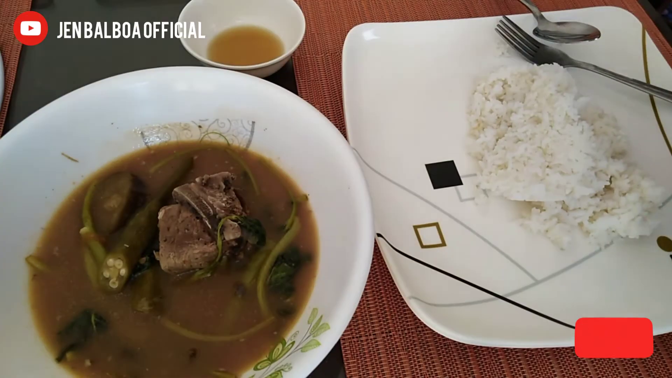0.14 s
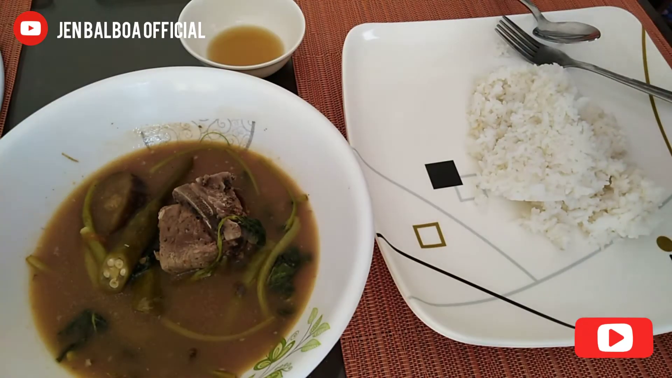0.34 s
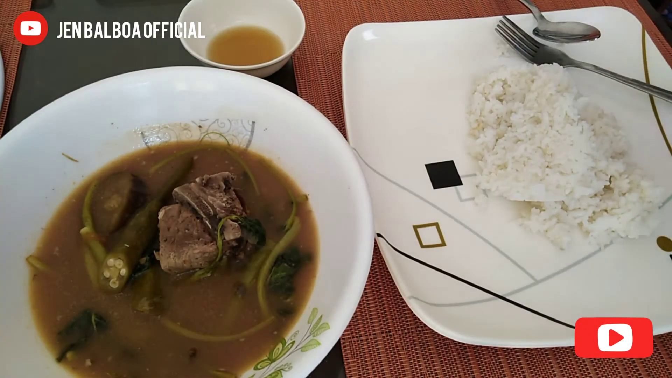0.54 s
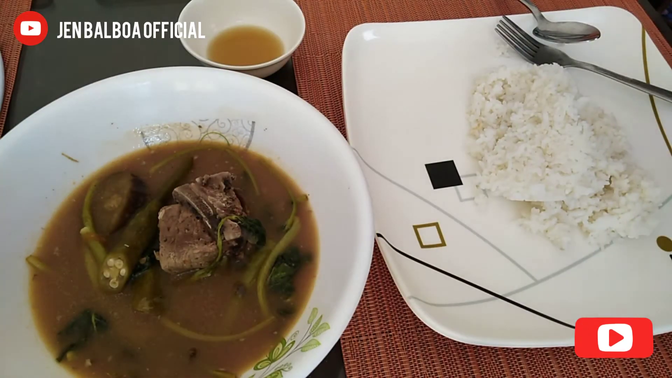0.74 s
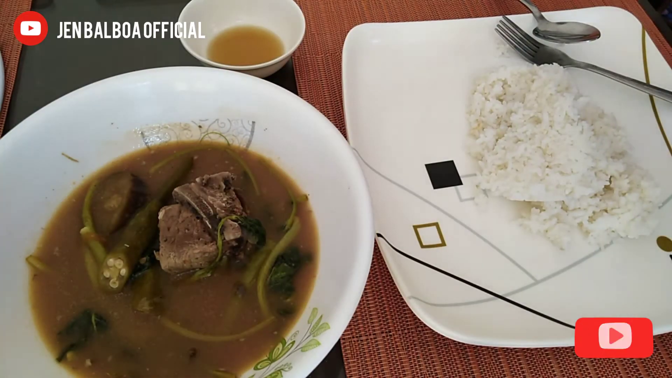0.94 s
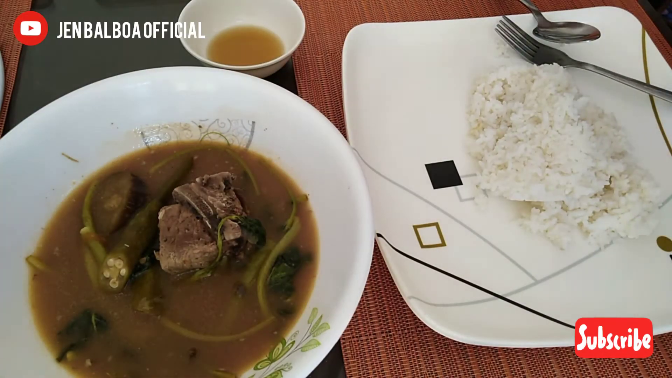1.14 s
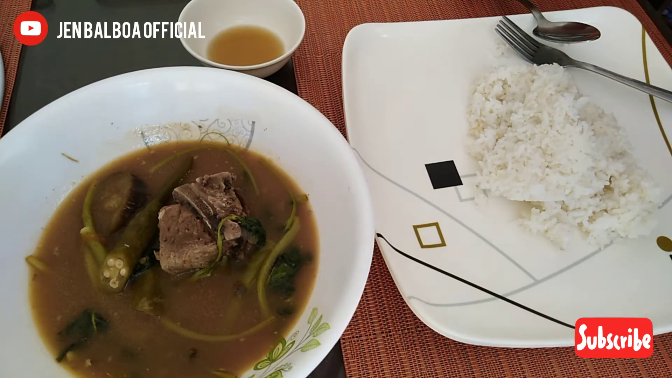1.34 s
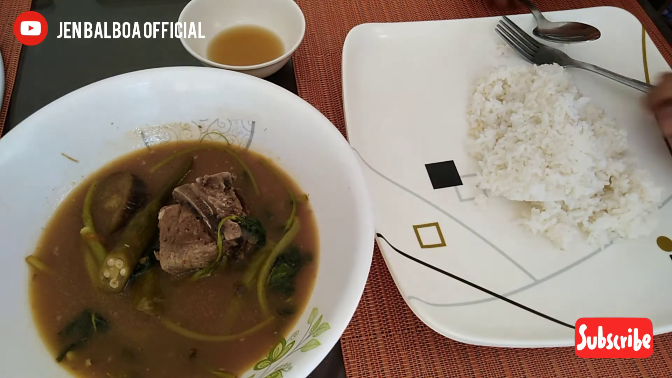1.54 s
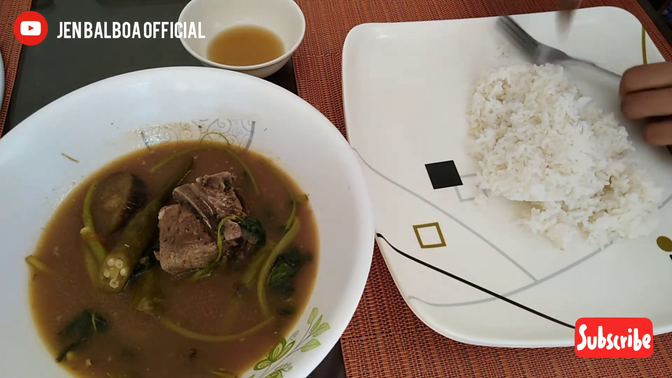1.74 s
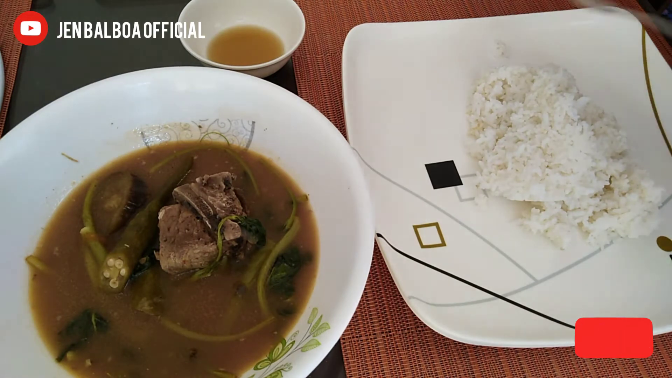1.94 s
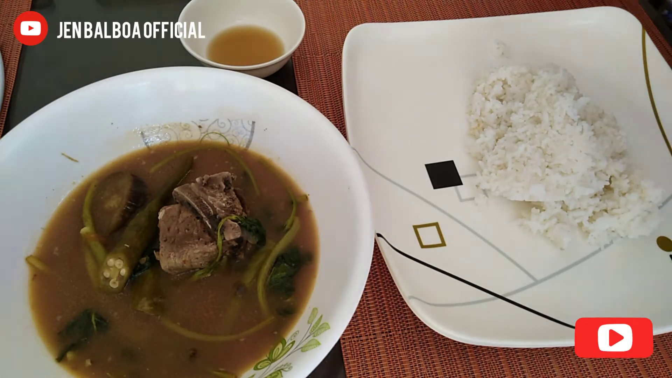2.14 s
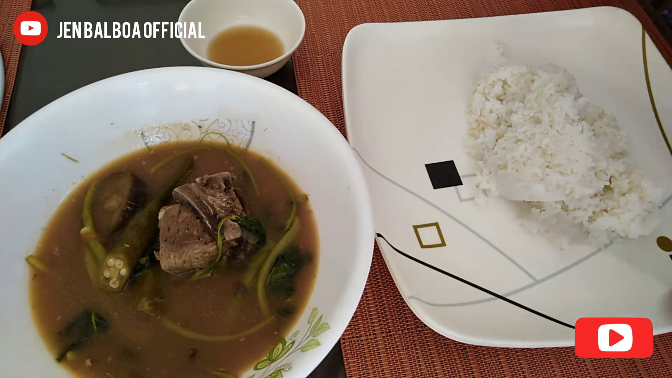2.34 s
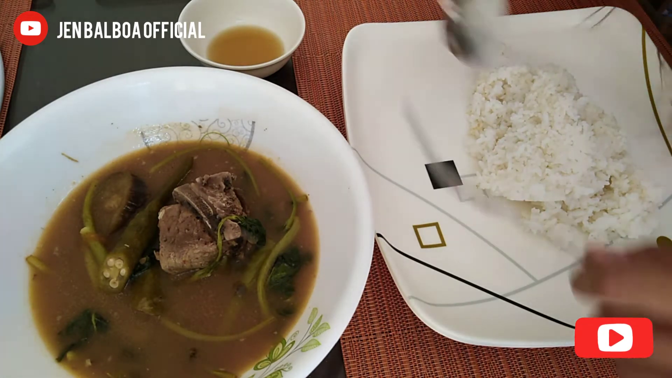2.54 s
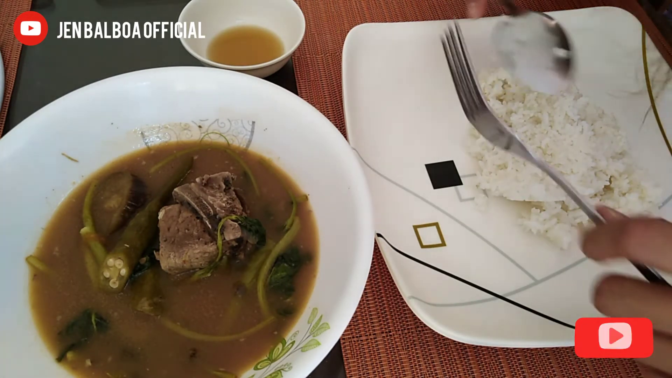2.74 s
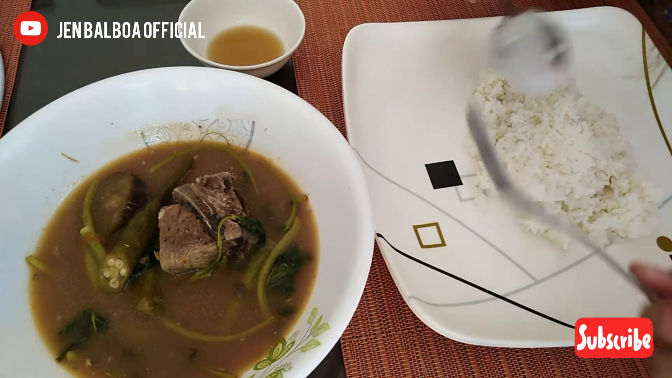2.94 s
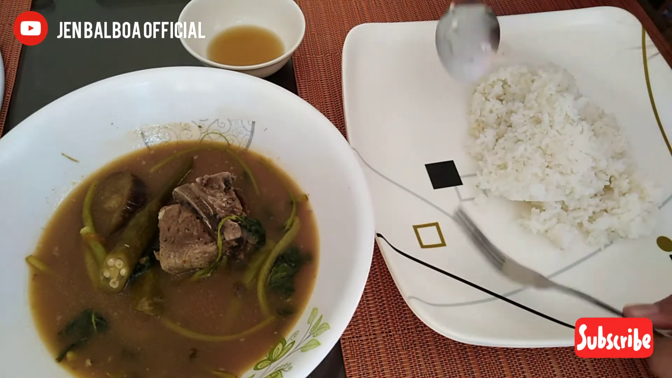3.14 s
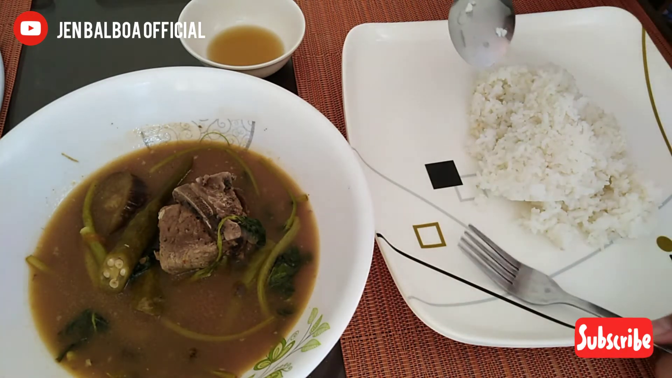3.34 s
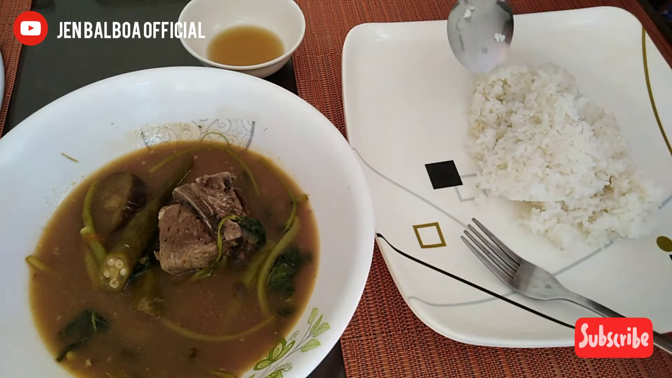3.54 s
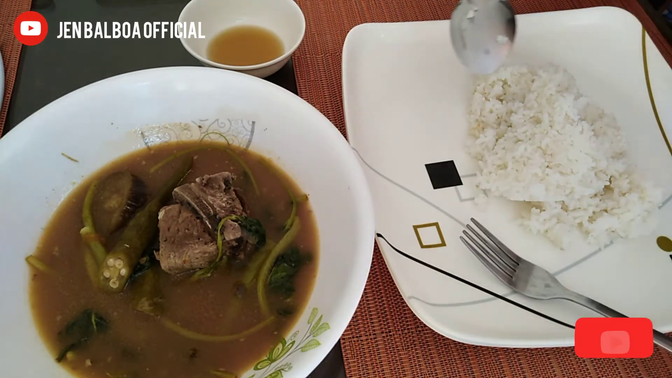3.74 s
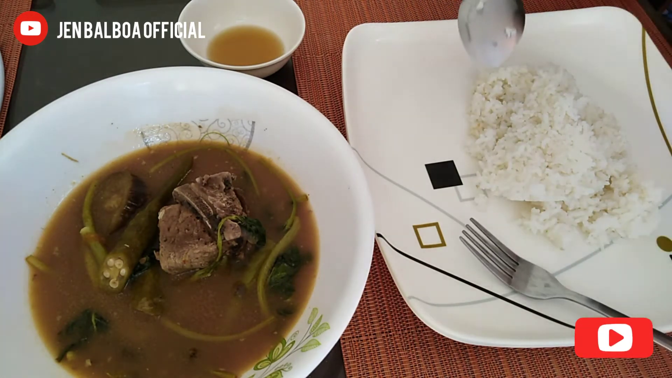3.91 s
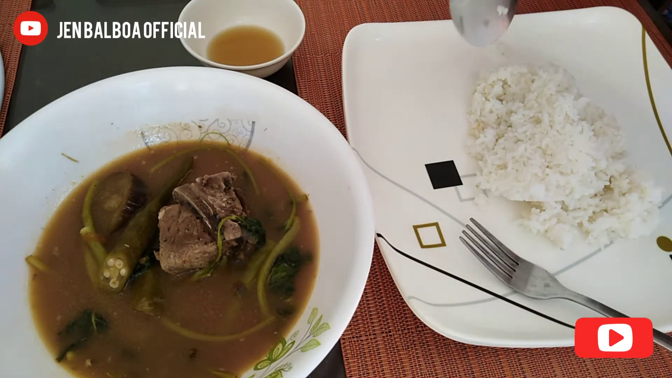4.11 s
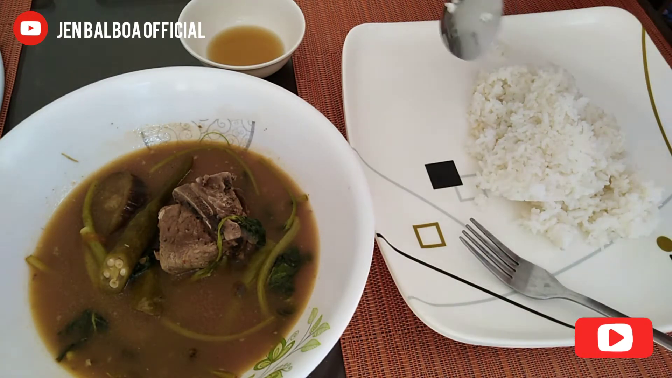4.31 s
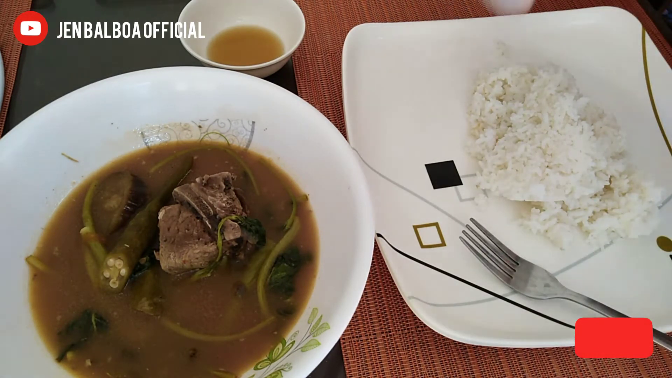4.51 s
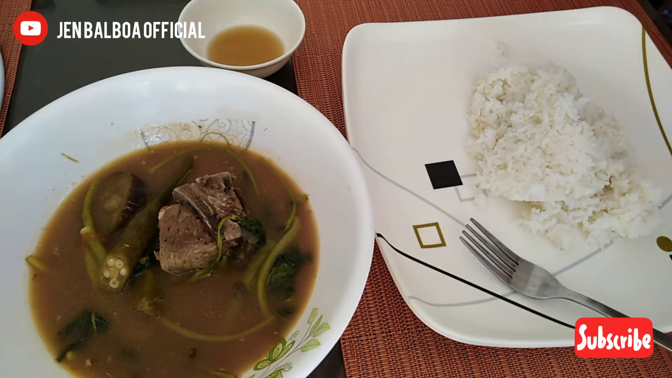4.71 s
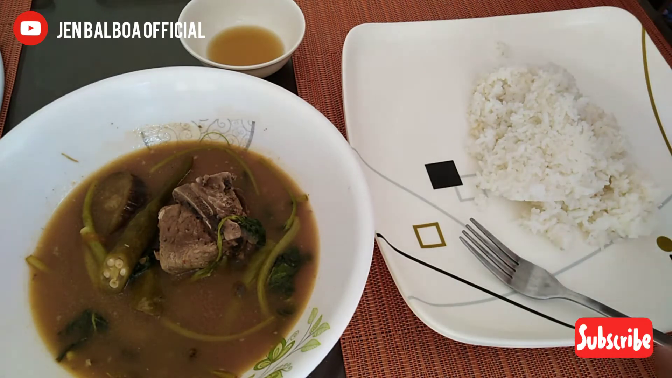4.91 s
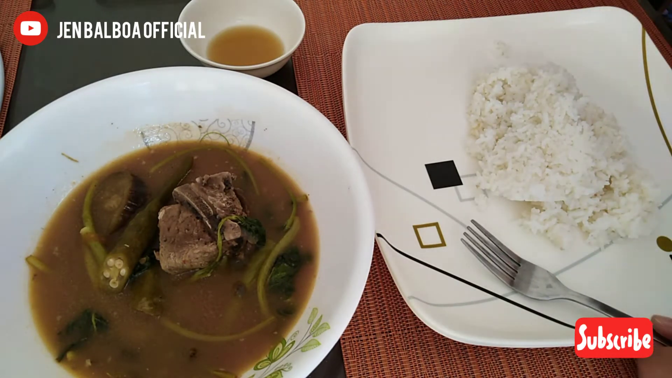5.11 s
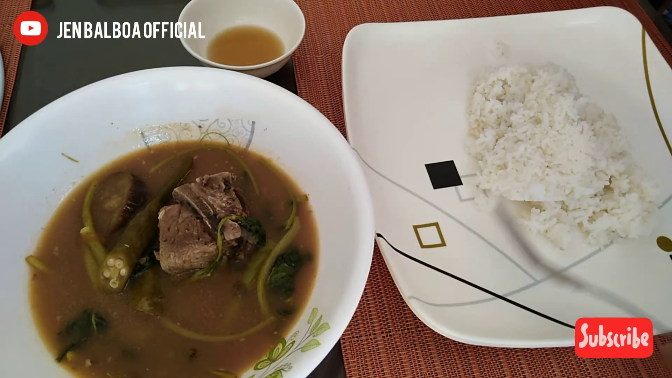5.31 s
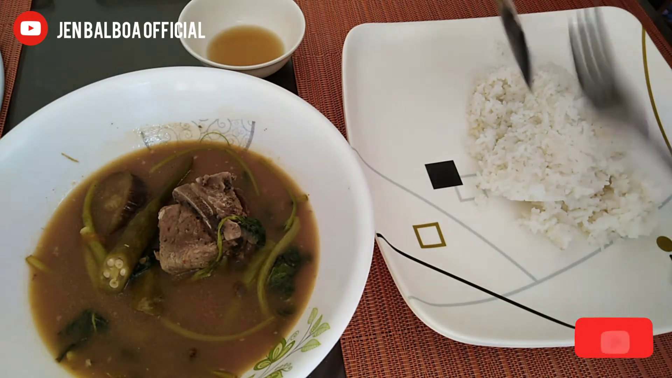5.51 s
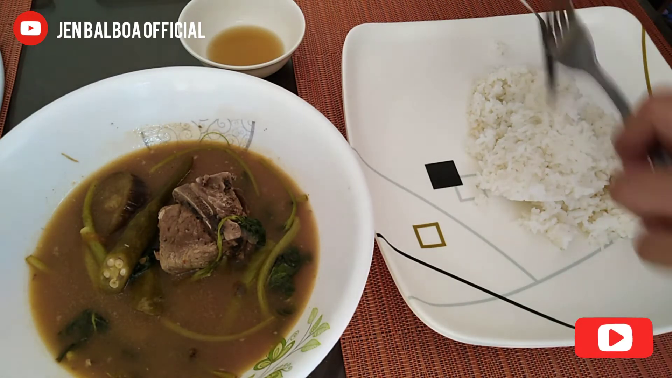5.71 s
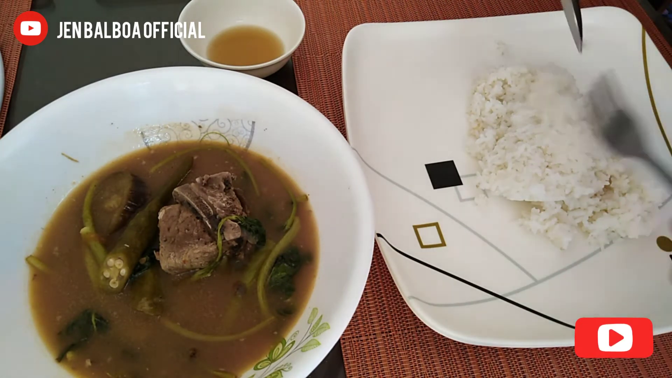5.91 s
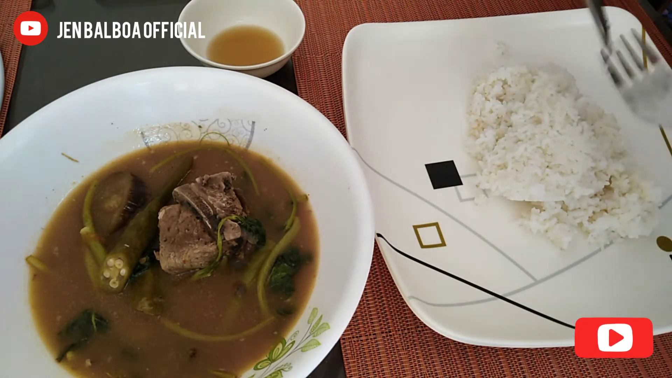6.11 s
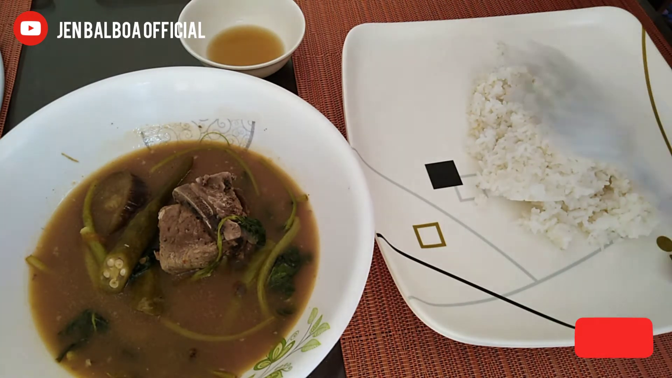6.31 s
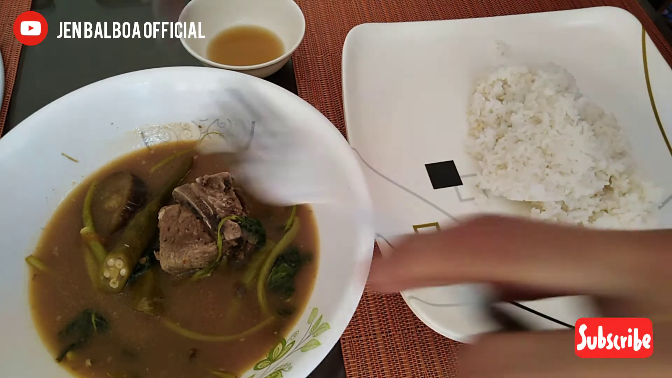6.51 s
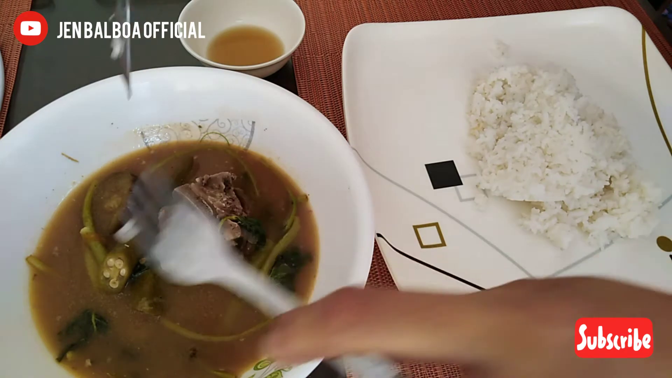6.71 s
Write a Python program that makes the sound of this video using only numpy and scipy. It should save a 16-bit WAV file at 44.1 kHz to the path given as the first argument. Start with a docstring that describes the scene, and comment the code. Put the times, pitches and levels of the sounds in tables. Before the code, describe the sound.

A fork clinks sharply against a spoon and knocks hard on a ceramic plate in a small room, with low air buffeting the microphone.

```python
"""Cutlery on a ceramic plate

A fork taps a ceramic plate, clinks on a spoon and drags on the glaze, close to a phone over the table:
decaying sine modes plus noisy clatter for the blows, resonated noise for the drags and brushes.
A decaying-noise tail gives the small hard room. A draught of shaped noise buffets mostly the left port,
over a wavering room drone of noise bands and a mains hum sine.
"""
import sys
import numpy as np
from scipy import signal
from scipy.fft import rfft, irfft
from scipy.io import wavfile
from scipy.ndimage import uniform_filter1d

SR = 44100
rng = np.random.default_rng(int(sys.argv[2]) if len(sys.argv) > 2 else 0)


def digitize_waveform(pressure):
    """Quantize a signal to 16-bit integers and store it at the path in sys.argv[1].

    Rows of a 2-D input are taken as channels; values are limited to [-1, 1].
    """
    field = np.atleast_2d(pressure).T
    bounded = np.clip(field, -1, 1)
    quanta = np.round(bounded * 32767).astype(np.int16)
    wavfile.write(sys.argv[1], SR, quanta)


def ratio(d):
    """dB to gain"""
    e = np.asarray(d, float) / 20
    return 10 ** e


N = 302456

# fork on plate: (time [s], direct right-port peak [dB], low-end tilt [dB], treble tilt [dB],
# contact time scale [ms], place of the blow [0-1])
PLATE_TAPS = [(1.539, -39, -9, -11, 2.9, .064), (3.232, -11.5, -4, -11, 1.9, .15),
              (3.357, -7, -3.5, -6.5, 1.5, 0.2), (3.368, -15, -3.5, -8.5, 1.6, 0.3),
              (3.433, -15.5, -10, -10.5, 2.1, .25), (3.466, -20.5, -7, -13, 2, 0.1),
              (3.498, -25.5, -6.5, -14.5, 2.3, 0.5), (5.078, -50, 0.5, -10.5, 6.2, 0.9),
              (5.104, -55, 7, -9, 1.73, 0.9), (5.155, -51, -6, -6.5, 5.7, .22)]
# fork on spoon: (time [s], direct right-port peak [dB], low-end tilt [dB], treble tilt [dB],
# contact time scale [ms], place of the blow [0-1])
SPOON_CLINKS = [(1.744, -15.5, -4.5, -11.5, 1.4, .2), (1.762, -33, 0, -11, 3.0, .2),
                (5.686, -7.5, -11, 4, 2.2, .25), (5.694, -12, -8, 9, 2, .33),
                (5.701, -18, -5.5, 13, 2.5, .26), (5.761, -16, -14.5, 3, 0.76, .42),
                (6.083, -11.5, -25.5, 10.5, 1.01, .367)]
# ringing modes of the ceramic: (frequency [Hz], relative level [dB], t60 [s])
PLATE_MODES = [(689.2, -9.5, 0.097), (880, -3.5, 0.22), (922, -5, 0.12), (1051, -5, 0.054), (1256, 0, 0.04),
               (1524.4, 0, 0.042), (1936, -20, 0.43), (2126, -14.5, 0.18), (2312, -0.5, 0.067),
               (2565, -2, 0.067), (2833, -6.5, 0.05), (3130, -6.5, 0.03), (3670, -6.5, 0.04),
               (3960, -12, 0.075), (4400, -14, 0.035), (5110, -23, 0.4), (5862, -4.5, 0.038),
               (6630, -7, .04), (7090, -7.5, 0.043), (7970, -1.5, .07), (9170, -7, 0.085),
               (10130, -7, 0.015), (11600, -7.5, 0.039), (13500, -13, 0.025)]
# ringing modes of the cutlery: (frequency [Hz], relative level [dB], t60 [s])
STEEL_MODES = [(1870, -16.5, 0.07), (2290, -14.5, .05), (2760, -12, 0.068), (3064, -8, 0.065),
               (3585, -8.5, 0.013), (3948, -11, 0.032), (4140, -14, 0.017), (4740, -17, .04),
               (5130, -22, 0.11), (5765, -9.5, 0.021), (6604, -1, 0.022), (7225, -5.5, 0.073),
               (7650, -9.5, 0.066), (8344, -11.5, 0.025), (8936, -31, .75), (9800, -6, .035),
               (10340, -14, .05), (11040, -20, .42), (11690, -3, .035), (11910, -7, .04), (12390, -16, .32),
               (12980, -8, .08), (13200, -8.5, 0.039), (14900, -28, .05)]
# tines over the glaze: (start [s], rise to full pressure [s], lift-off [s],
# plate level at full pressure [dB], fork level re plate [dB])
TINE_DRAGS = [(1.6, 0.045, .09, -39.5, -10.5), (5.164, .075, .09, -47, -10)]
# faint brushes of steel: (centre time [s], 1/e half-length [s], centre [Hz], width per pass [Hz], level [dB])
STEEL_BRUSHES = [(0.303, 0.024, 11650, 604, -78), (0.847, 0.019, 7840, 933, -71),
                 (2.363, 0.012, 5370, 300., -83), (4.291, 0.042, 11500, 4040, -73)]
# left port behind the phone body: (frequency [Hz], gain [dB])
BODY_SHADOW = [(500, 0), (2000, -1.5), (8000, -2.5), (13000, -8.5)]
# room decay: (frequency [Hz], t60 [s])
ROOM_DECAY = [(500, 0.51), (2000, 0.33), (5000, 0.34), (12000, 0.29)]
# gusts: (peak time [s], relative peak [dB], rise over the last 20 dB [s], fall over 20 dB [s])
# rise and fall below 0.005 s count as 0.005 s
GUST_PEAKS = [(0.041, -42.5, -0.37, 0.12), (0.094, -28.5, 0.05, 0.01), (0.178, -42, 0.2, -0.19),
              (0.27, -54, 0.5, -0.5), (0.362, -42, .08, -0.37), (0.425, -44.5, -0.02, 0.57),
              (0.515, -33.5, -0.07, 0.03), (0.56, -27, -0.0148, 0.01), (0.628, -33.5, 0.13, 0.33),
              (0.801, -25, 0.03, 0.1135), (0.88, -41, 0.6, 0.07), (0.985, -40.5, .08, 0.14),
              (1.14, -54.5, -1.2, 0.1), (1.221, -48, -0.04, 0.02), (1.348, -60, 1.5, .04),
              (1.551, -56.5, -0.06, 0.24), (1.78, -57, -0.24, .05), (1.894, -58.5, 0.1, -0.02),
              (2.014, -52.5, -0.04, 0.23), (2.19, -60, -0.9, 0.18), (2.764, -60, -0.42, -0.15),
              (2.91, -47, 0.02, .2), (3.102, -52.5, -0.35, 0.1), (3.4, -54, -0.2, 0.36),
              (3.572, -52.5, 0, 0.22), (3.9, -62, -0.8, -0.2), (4.004, -66, 0.1, 0.25),
              (4.617, -61, 0.15, 0.3), (4.984, -53.5, 0.17, -0.23), (5.097, -49, 0.24, .03),
              (5.241, -46.5, 0.23, 0.15), (5.315, -47.5, 0.0645, 0.32), (5.718, -38.5, -0.0335, 0.1),
              (5.81, -46.5, -0.17, 0.23), (5.92, -36.5, 0.01, 0.2), (6.009, -43, -0.17, 0.39),
              (6.219, -34, -0.02, 0.08), (6.296, -30.5, -0.04, 0.0463), (6.365, -51.5, -0.54, -0.1),
              (6.635, -47, -0.33, 0.14)]
# draught spectrum: (frequency [Hz], relative density [dB per Hz])
BUFFET_SPECTRUM = [(25, -30), (38, -16.5), (55, -1.5), (80, 5.5), (120, 0), (200, -10), (350, -22.5),
                   (700, -38.5), (1100, -65), (4000, -72.5), (14000, -80.5)]
# drone course: (time [s], base level of low bands [dB], base level of high bands [dB])
DRONE_COURSE = [(0.0, -68.5, -76), (0.8, -63.5, -68.5), (1.3, -71.5, -75.5), (1.7, -66.5, -71),
                (2.2, -69.5, -77.5), (2.7, -73.5, -77), (3.15, -70, -75.5), (3.45, -62, -72.5),
                (3.7, -71.5, -75), (4.4, -71.5, -79), (4.95, -72, -77.5), (5.23, -67, -68.5),
                (5.5, -72.5, -79.5), (5.8, -64.5, -69), (6.3, -66.5, -76.5), (6.86, -70, -76)]
# low room resonances: (centre [Hz], width per pass [Hz], level re course [dB])
DRONE_LOW_BANDS = [(121, 7.5, -2.5), (192.6, 40, 3.5), (300, 292, 3), (477.4, 73, -2.5)]
# high room resonances: (centre [Hz], width per pass [Hz], level re course [dB])
DRONE_HIGH_BANDS = [(697, 69, -4.5), (820, 140, 4.5), (986, 90, -3.5), (1140, 44, -13), (1270, 130, -15.5)]
# brief dips of drone and hum: (centre time [s], 1/e half-length [s], depth [dB])
DRONE_DIPS = [(1.102, 0.017, -14), (1.421, 0.099, -4.5), (1.959, 0.016, -14.5), (2.248, 0.025, -9),
              (2.381, 0.0049, -11), (2.52, 0.037, -9), (2.835, 0.019, -13), (3.172, 0.041, -8.5),
              (3.909, 0.056, -3.5), (5.647, 0.013, -9.5)]
# noise suppressor threshold: (frequency [Hz], threshold [dB per bin])
SUPPRESSOR_THRESHOLD = [(50, -85), (400, -83), (900, -83.5), (1500, -96), (4000, -105), (14000, -108)]
# faint hiss added after the suppressor: (frequency [Hz], relative density [dB per Hz])
HISS_SPECTRUM = [(1000, 9), (3000, 4), (8000, -2), (14000, -2.5)]

TAP_LEAD_MS, CLINK_LEAD_MS = 0.15, 0.2  # left port leads the right


def noise(*shape):
    """White noise."""
    return rng.standard_normal(shape)


def unit(x):
    """Scales x to rms 1."""
    return x / np.sqrt(np.mean(x ** 2))


def colour(x, points):
    """Filters x by (frequency [Hz], gain [dB]) points."""
    hz, db = np.transpose(points)
    f_hz = np.arange(x.shape[-1] // 2 + 1) * SR / x.shape[-1] + 1
    gain = ratio(np.interp(np.log(f_hz), np.log(hz), db))
    return irfft(rfft(x) * gain, x.shape[-1])


def band(x, hz, width_hz):
    """Resonance applied twice, for dark valleys."""
    b, a = signal.iirpeak(hz, hz / width_hz, SR)
    return signal.lfilter(b, a, signal.lfilter(b, a, x))


def curve(rows):
    """Columns of a table, one value per sample."""
    s, *columns = np.transpose(rows)
    return [np.interp(np.arange(N) / SR, s, c) for c in columns]


def walk(rate_hz):
    """Random levels of rms 1, held 1 / rate_hz and slewed twice."""
    k = int(SR / rate_hz)
    held = np.repeat(noise(N // k + 1), k)
    return unit(uniform_filter1d(uniform_filter1d(held, k), k)[:N])


def ring(modes, place):
    """Impulse response at both ports: decaying sines, weighted by the place of the blow."""
    unlike_hz = 1800  # phases spread fully between the ports above this
    hz, db, t60_s = np.transpose(modes)[:, :, None]
    t = np.arange(SR // 2) / SR
    order = np.arange(1, len(modes) + 1)
    weight = 0.2 + np.abs(np.sin(np.pi * place * order))[:, None]
    left_phase = np.minimum(hz / unlike_hz, 1) ** 2 * rng.uniform(-2.2, 2.2, hz.shape)
    decay = weight * ratio(db - 60 * t / t60_s)
    return np.array([np.sum(decay * np.sin(2 * np.pi * hz * t + phase), axis=0)
                     for phase in (left_phase, 0)])


def add(out, x, s, lead_ms):
    """Places a left-right pair; the left port is nearer but shaded by the phone body."""
    for side, y, late_s in ((0, colour(x[0], BODY_SHADOW), 0), (1, x[1], lead_ms / 1000)):
        i = int((s + late_s) * SR)
        out[side, i:i + len(y)] += y[:N - i]


def blows(rows, modes, low_hz, high_hz, crack_db, lead_ms):
    """Each contact rings the modes, softened by its duration, and adds a noisy clatter."""
    knock_hz = 670  # rolled off below this
    pre = 99  # samples of room ahead of the blow for the filter
    out, t = np.zeros((2, N)), np.arange(SR // 2) / SR
    for s, db, low_db, treble_db, contact_ms, place in rows:
        u = t * 1000 / max(contact_ms, 0.2)
        body = ring(modes, place) * (1 - np.exp(-u ** 2))
        # the clatter reaches the two ports by partly different paths
        grit = (noise(len(t)) + 0.88 * noise(2, len(t))) * ratio(3.7 * noise(len(t)))
        resonant = sum(ratio(0.5 * d) * band(grit, hz, hz * 0.07) for hz, d, _ in modes)
        grit = unit(grit) + 0.55 * unit(resonant)
        snap = u * np.exp(-u)
        rattle = 0.41 * np.exp(-u / 8) * (1 - np.exp(-u))
        crack = (snap + rattle) * grit
        # harder blows clatter more; light touches are pitched ticks
        x = body / np.abs(body).max() + ratio(crack_db + 3.0 + 0.36 * db) * crack
        tilt = [(knock_hz * 0.71, low_db - 26), (knock_hz, low_db), (low_hz, low_db),
                (low_hz * 1.4, 0), (high_hz * 0.92, 0), (high_hz * 1.5, treble_db)]
        x = colour(np.roll(x, pre, axis=1), tilt)
        add(out, ratio(db) * x / np.abs(x[1]).max(), s - pre / SR, lead_ms)
    return out


def fork_on_plate():
    """Taps ring the ceramic modes."""
    return blows(PLATE_TAPS, PLATE_MODES, 1200, 4500, 5.9, TAP_LEAD_MS)


def fork_on_spoon():
    """Clinks ring the steel modes."""
    return blows(SPOON_CLINKS, STEEL_MODES, 2800, 8300, 3.3, CLINK_LEAD_MS)


def drags():
    """Uneven slips of the tines ring the plate, and the fork above it; pressure builds, then lifts."""
    rise_db, fall_db = 17.5, 31
    out = np.zeros((2, N))
    for s, rise_s, fall_s, peak_db, fork_db in TINE_DRAGS:
        count = int((rise_s + fall_s) * SR)
        pressure_db = peak_db + np.interp(np.arange(count) / SR, [0, rise_s, rise_s + fall_s],
                                          [-rise_db, 0, -fall_db])
        uneven_db = 4.5 * noise(count) + 1.3 * walk(150.7)[:count]
        slips = (noise(count) + 0.88 * noise(2, count)) * ratio(uneven_db)
        slips = slips * signal.windows.tukey(count, 0.1)
        plate = sum(ratio(0.3 * d - hz / 300) * band(slips, hz, hz * 0.03)
                    for hz, d, _ in PLATE_MODES if 1400 < hz < 4200)
        # the upper plate-table modes serve for the fork
        fork = sum(ratio(0.13 * d) * band(slips, hz, hz * 0.02)
                   for hz, d, _ in PLATE_MODES if 4300 < hz < 13000)
        add(out, ratio(pressure_db) * (unit(plate) + ratio(fork_db) * unit(fork)), s, CLINK_LEAD_MS)
    return out


def brushes():
    """Soft bell-shaped puffs of noise, each in one high band."""
    t = np.arange(N) / SR
    out = 0
    for s, length_s, hz, width_hz, db in STEEL_BRUSHES:
        puff = np.exp(-((t - s) / length_s) ** 2)
        out = out + ratio(db) * puff * unit(band(noise(2, N), hz, width_hz))
    return out


def room(x):
    """Diffuse tail of decaying noise bands, different at each port, the bass lasting longest."""
    t, tail = np.arange(SR * 3 // 4) / SR, 0
    decay_hz, decay_s = np.transpose(ROOM_DECAY)
    for hz in 350 * 2 ** np.arange(0, 5.6, 0.5):
        t60_s = np.interp(np.log(hz), np.log(decay_hz), decay_s)
        # the close ports hear nearly the same bass, unrelated treble
        spread = unit(noise(len(t)) + hz / 1500 * noise(2, len(t)))
        tail = tail + band(spread, hz, hz * 0.38) * ratio(-60 * t / t60_s)
    tail = tail * (1 - np.exp(-t / 0.0038))
    return signal.fftconvolve(x, tail / np.sqrt(np.sum(tail[0] ** 2)), axes=1)[:, :N]


def draught():
    """Eddies beat on each port separately, in short uneven puffs; stronger gusts lean left."""
    calm_db, calm_wander_db = -74, 5  # still air between gusts, before the final gain
    pan_from_db, pan_db_per_db, pan_max_db = -69, 1.4, 23.5
    t = np.arange(N) / SR
    power = ratio(2 * (calm_db + calm_wander_db * walk(12)))
    for s, peak_db, rise_s, fall_s in GUST_PEAKS:
        away = np.maximum((s - t) / max(rise_s, 0.005), (t - s) / max(fall_s, 0.005))
        power = power + ratio(2 * peak_db - 40 * away)
    pan_db = np.clip(pan_db_per_db * (10 * np.log10(power) - pan_from_db), 0, pan_max_db)
    puffs = np.array([ratio(4.2 * walk(35)), ratio(3.0 * walk(30))])
    eddies = colour(unit(puffs * noise(2, N)), BUFFET_SPECTRUM)
    # steady the slow strength so that the gusts set it
    eddies = eddies / uniform_filter1d(eddies ** 2, SR // 12) ** 0.7
    sides = np.array([1 / (1 + ratio(-2 * pan_db)), 1 / (1 + ratio(2 * pan_db))])
    return ratio(7.0) * np.sqrt(power * sides) * unit(eddies)


def drone():
    """Air and distant machines in the room's low resonances, each wavering alone, plus mains hum."""
    hum_hz, hum_db = 60.7, -69
    t, out = np.arange(N) / SR, 0
    low_db, high_db = curve(DRONE_COURSE)
    for bands, course_db, flicker_db in ((DRONE_LOW_BANDS, low_db, 3.0), (DRONE_HIGH_BANDS, high_db, 4.0)):
        for hz, width_hz, db in bands:
            mid, side = unit(band(noise(2, N), hz, width_hz))
            stereo = mid + min(hz / 6600, 1) * side * np.array([[1], [-1]])
            out = out + ratio(course_db + db + flicker_db * walk(14)) * stereo
    hum = ratio(hum_db + 2.5 * walk(6)) * np.sin(2 * np.pi * hum_hz * t)
    dip_db = sum(db * np.exp(-((t - s) / length_s) ** 2) for s, length_s, db in DRONE_DIPS)
    return (out + hum) * ratio(dip_db)


def suppress(x):
    """Turns down bins near or below threshold: tails end early and the drone goes lumpy."""
    f_hz, _, z = signal.stft(x, SR, nperseg=1024)
    power = uniform_filter1d(np.mean(np.abs(z) ** 2, axis=0), size=2, axis=0)
    hz, db = np.transpose(SUPPRESSOR_THRESHOLD)
    limit = ratio(2 * np.interp(np.log(f_hz + 1), np.log(hz), db))[:, None]
    return signal.istft(z * power / (power + limit), SR, nperseg=1024)[1][:, :N]


def scene():
    """Cutlery with its room tail, over draught and drone."""
    room_db = -9
    cutlery = fork_on_plate() + fork_on_spoon() + drags()
    return cutlery + ratio(room_db) * room(cutlery) + brushes() + draught() + drone()


def top_cut(x):
    """Nothing passes above the cut-off."""
    return signal.sosfilt(signal.butter(12, 15460, fs=SR, output="sos"), x)


def record(dry):
    """Bass cut; noise suppressor; faint hiss added after it, rising a little with the load; top cut."""
    bass_cut_hz, top_cut_hz, hiss_db = 45, 14900, -85
    load = uniform_filter1d(dry ** 2, SR // 15).mean(axis=0)
    dry = signal.sosfilt(signal.butter(3, bass_cut_hz, "high", fs=SR, output="sos"), dry)
    hiss_gain = ratio(hiss_db) * (1 + load / ratio(-100)) ** 0.12
    mix = suppress(dry) + hiss_gain * colour(noise(2, N), HISS_SPECTRUM)
    mix = signal.sosfilt(signal.cheby2(10, 30, top_cut_hz, fs=SR, output="sos"), mix)
    return top_cut(mix)


dry = scene()
out = record(dry)
digitize_waveform(out)
```